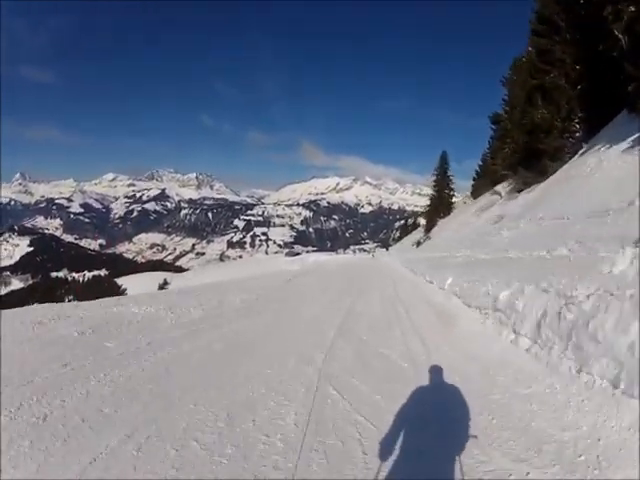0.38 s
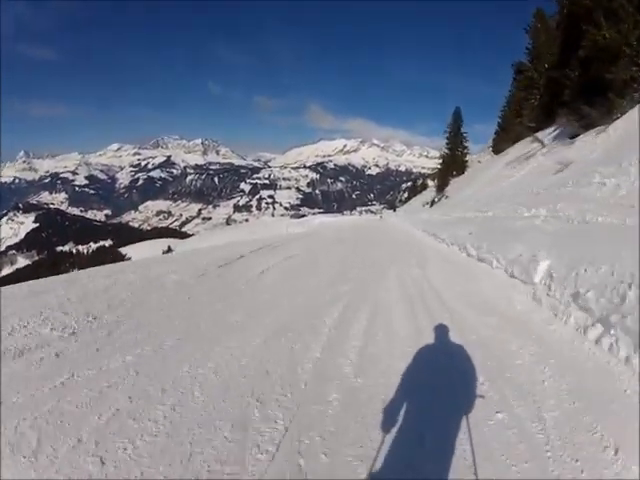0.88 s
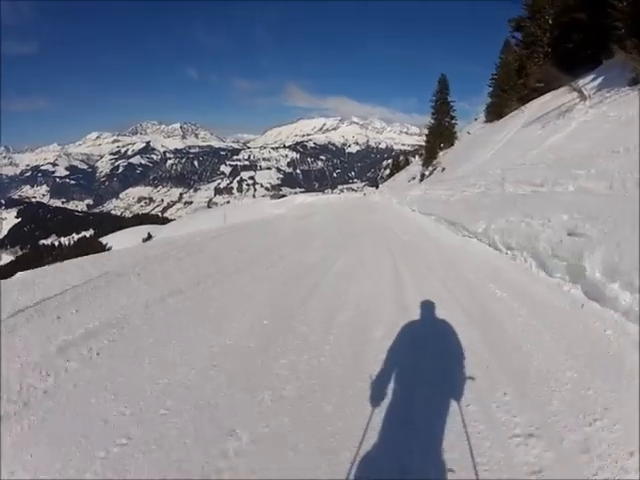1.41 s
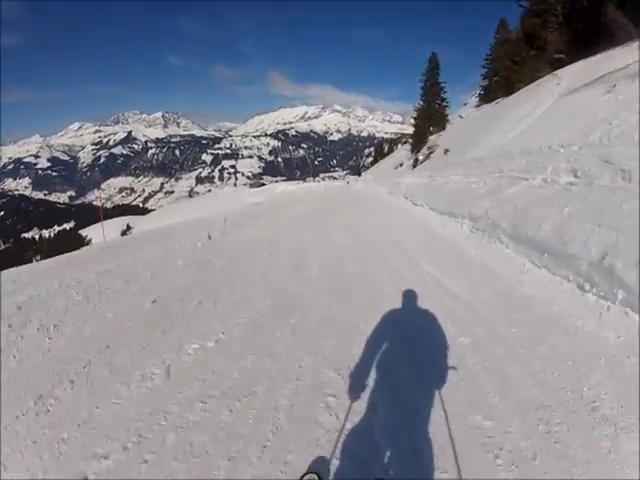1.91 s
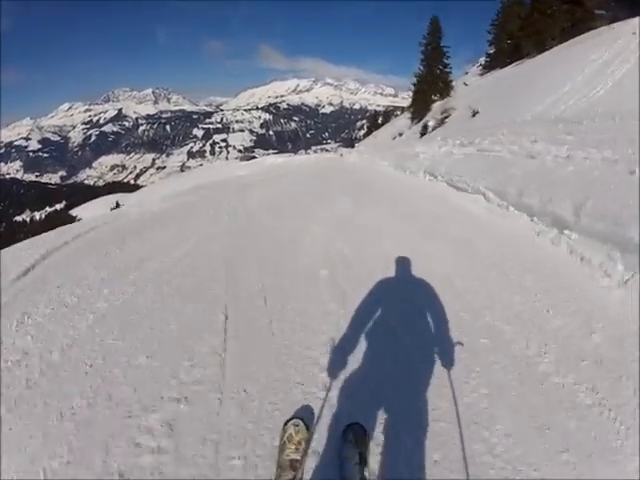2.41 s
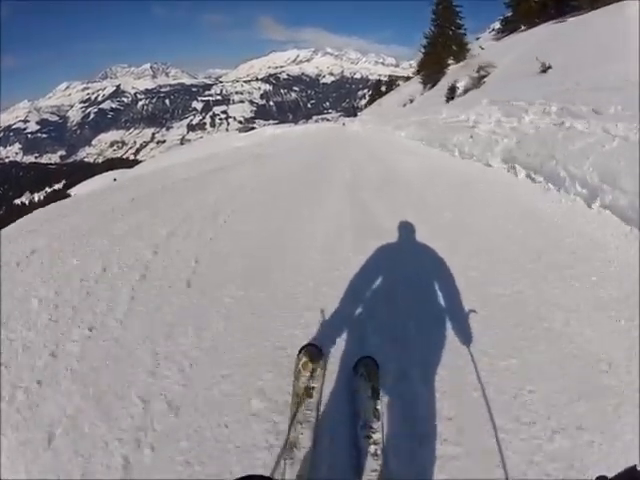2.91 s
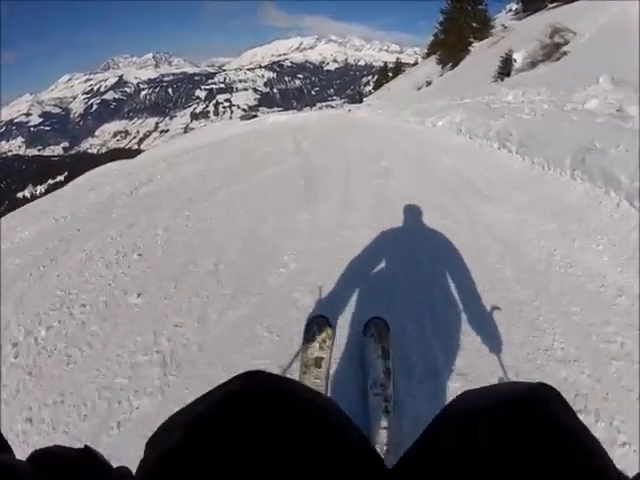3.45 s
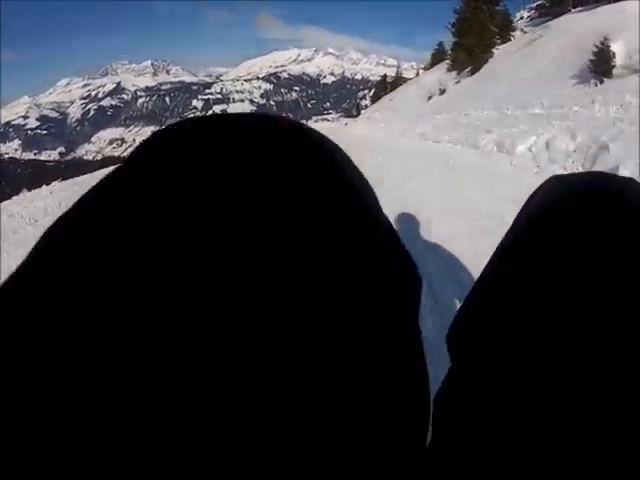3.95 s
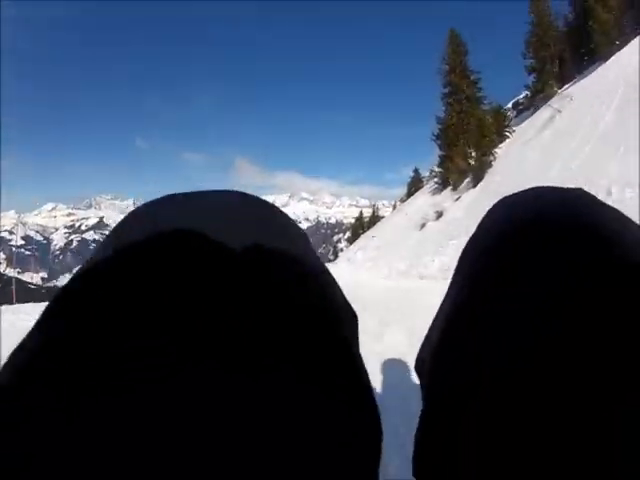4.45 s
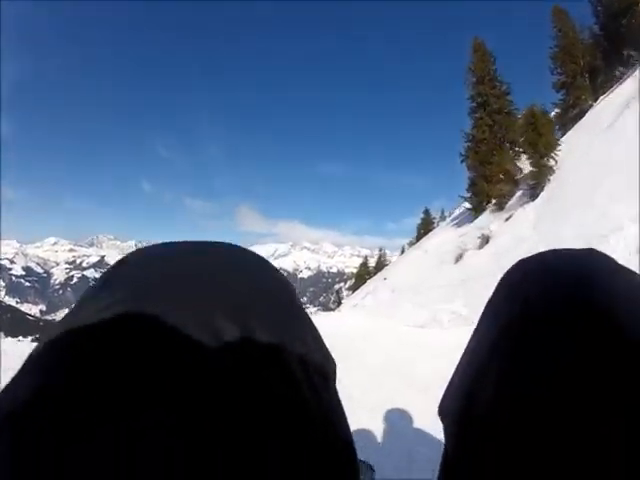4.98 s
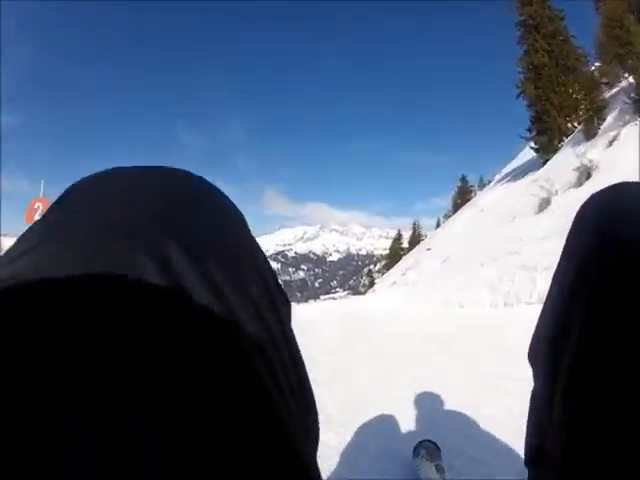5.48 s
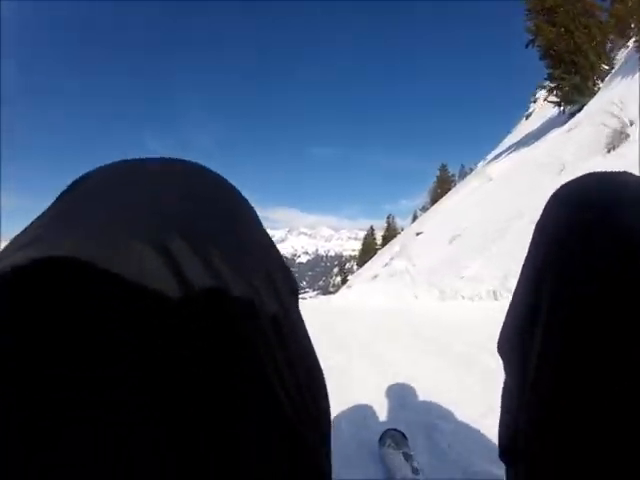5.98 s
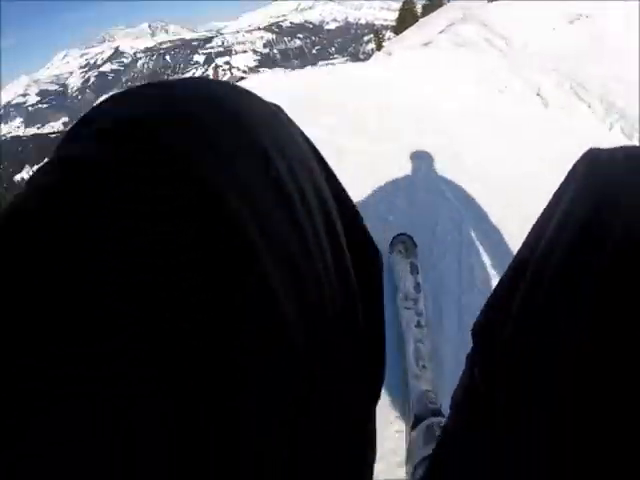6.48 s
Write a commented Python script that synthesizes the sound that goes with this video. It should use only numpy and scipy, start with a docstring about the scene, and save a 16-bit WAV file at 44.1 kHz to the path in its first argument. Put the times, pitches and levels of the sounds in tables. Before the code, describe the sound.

Skis hiss and scrape over packed snow, quiet at first, then louder and faster as wind buffets the microphone with low rumbling thumps.

```python
"""A piste of packed snow: a skier glides down, then crouches and gathers speed.
Noise and crushed grains ring the housing as ski hiss, with finer spray and a hollow drone.
Ice crumbs and buckles tick as decaying noise bursts; bumps thud through the body as short ringing pushes.
Wind shakes the sealed camera housing as lumpy low noise and single eddies; an edge grates over ice once.
The recorder samples at 12 kHz and holds each sample, which mirrors the sound up into the treble."""
import sys
import numpy as np
from scipy import signal
from scipy.io import wavfile

SR = 44100
rng = np.random.default_rng(int(sys.argv[2]) if len(sys.argv) > 2 else 0)


def field_ratio(decibels):
    """Amplitude ratio for a level in dB (20 dB per decade); scalars and array-likes work."""
    return 10 ** (np.asarray(decibels, dtype=float) / 20)


def unload_wav(signal):
    """Save mono or channel-first audio to the path in sys.argv[1] as 16-bit WAV at rate SR, clipped to [-1, 1]."""
    wavfile.write(
        sys.argv[1],
        SR,
        np.round(np.clip(np.atleast_2d(signal).T, -1, 1) * 32767).astype(np.int16),
    )


N = 291942  # samples, 6.62 s

# resonances of the housing: pitch_hz, width_hz, relative_level_db
HOUSING_MODES = [(1966, 180, 6), (2250, 240, 2.5), (2614, 64, -3), (3010, 240, -9), (3496, 278, 1),
                 (3810, 170, -3)]
# lower resonances of the housing, fed by the skier's weight: pitch_hz, width_hz, relative_level_db
LOW_HOUSING_MODES = [(1220, 340, -3), (1480, 164, -4.5), (1790, 330, -3.5)]


def rms_one(x):
    """Scale to unit power."""
    return x / np.sqrt(np.mean(x ** 2) + 1e-20)


def in_time(rows):
    """Columns of a table as curves, one value a sample."""
    s, *columns = np.transpose(rows)
    return [np.interp(np.arange(N) / SR, s, column) for column in columns]


def drift(rate_hz):
    """Slow chance: noise at every 20th sample through a double one-pole low-pass; spread 1."""
    pole = np.exp(-40 * np.pi * rate_hz / SR)
    draws = rng.standard_normal(N // 20 + 3002)
    slow = signal.lfilter([1], [1, -2 * pole, pole * pole], draws)[3000:]  # settled part only
    return np.interp(np.arange(N) / 20, np.arange(len(slow)), rms_one(slow))


def resonate(x, hz, width_hz):
    """Two-pole resonance, gain 1 on top."""
    r = np.exp(-np.pi * abs(width_hz) / SR)
    gain = (1 - r * r) / 2
    return signal.lfilter(gain * np.array([1, 0, -1]), [1, -2 * r * np.cos(2 * np.pi * hz / SR), r * r], x)


def between(x, low_hz, high_hz):
    """Gentle band-pass edges darken the valleys; rms 1."""
    band = signal.butter(2, [low_hz, high_hz], "band", fs=SR, output="sos")
    return rms_one(signal.sosfilt(band, x))


def through(modes, drive, patchy_db, patch_rate_hz, passes=1):
    """Parallel resonances with alternating signs, each swelling a little on its own; rms 1."""
    out = 0
    for k, (hz, width_hz, db) in enumerate(modes):
        ring = drive[k % 2]
        for _ in range(passes):
            ring = resonate(ring, hz, width_hz)
        out = out + (-1) ** k * field_ratio(db + patchy_db * drift(patch_rate_hz)) * ring
    return rms_one(out)


def crust(per_s, spread_db):
    """Snow grains crush at random moments, a few much harder than most; rms 1."""
    hardness_db = spread_db * np.minimum(rng.exponential(1, N), 4.5)
    sizes = field_ratio(hardness_db) * rng.choice([-1, 1], N)
    chance = per_s * field_ratio(4.0 * drift(15.0)) / SR
    return rms_one(sizes * (rng.random(N) < chance))


def patches():
    """Level change in dB as the crust roughens or lets go: a quick rise, a slower fall."""
    # rougher crust (swell) or skis lifting off it (dip): centre_s, change_db, length_s
    crust_patches = [(0.043, 4.5, 0.022), (0.208, 5.5, 0.077), (0.57, 2.5, 0.022), (0.669, 7, 0.022),
                     (1.173, 3.5, .03), (1.252, 5, 0.042), (1.62, 3, 0.07), (1.777, 6.5, 0.056),
                     (1.94, 3, 0.023), (2.267, 5.5, 0.017), (2.402, 6.5, 0.071), (2.471, -7, 0.024),
                     (2.523, 4.5, .04), (2.625, 7, 0.047), (2.84, -4, 0.043), (3.07, 3.5, .07),
                     (3.458, 7, 0.027), (3.98, -5, 0.025), (4.027, 4, 0.045), (4.114, 6.5, 0.032),
                     (4.21, -2, 0.021), (4.488, 3, 0.025), (4.29, 4, 0.048), (4.62, 2, 0.023),
                     (4.772, 4, 0.04), (4.896, 0.5, 0.03), (4.98, -8, 0.038), (5.566, 6.5, 0.057),
                     (5.703, 0, 0.069), (5.904, 2, 0.14), (6.11, -1.5, 0.032), (6.143, -0.5, 0.021),
                     (6.297, 2.5, .04), (6.417, 5.5, 0.053), (6.49, 2, 0.037)]
    t = np.arange(N) / SR
    change_db = np.zeros(N)
    for centre_s, db, length_s in crust_patches:
        side_s = length_s * np.where(t < centre_s, 0.88, 1)  # shorter on the rising side
        change_db += db * np.exp(-((t - centre_s) / side_s) ** 2)
    return change_db


def wind():
    """Lumpy low turbulence shakes the housing, growing with the airflow; rough crust shakes the shell too."""
    # airflow past the housing: time_s, flow_db, buffeting_depth_db
    airflow = [(0.0, -50.5, 0.5), (0.31, -50.5, 1), (1.46, -51, -1), (1.68, -49, 1.5), (2.14, -50.5, -1),
               (2.49, -47, 0.5), (3.02, -46, 0.5), (3.32, -49, 2), (3.54, -48.5, 3), (3.69, -39, 0),
               (4.17, -38, 0), (4.39, -34.5, -1), (5.22, -31.5, -1), (5.6, -31.5, -1), (5.84, -33, 1.5),
               (6.36, -31, 1.5), (6.51, -31, -4), (6.62, -36.5, 0)]
    # slow buffeting: pitch_hz, width_hz, relative_level_db
    buffet_modes = [(25.9, 9.1, 9), (44.9, 5.6, 8), (62.7, 11, -4)]
    # low rumble, each resonance passed twice: pitch_hz, width_hz (one pass), relative_level_db
    rumble_modes = [(81.2, 54, 1), (126.3, 52, 0.5), (166, 31, -9)]
    # boom of the shell, each resonance passed twice: pitch_hz, width_hz (one pass), relative_level_db
    boom_modes = [(204.7, 84, -3), (257, 65.5, 0.5), (317, 125, -10.5)]

    flow_db, depth_db = in_time(airflow)
    swing_db = flow_db + 45  # around an airflow of -45 dB
    # level at that airflow, and the share of its swing that each layer follows
    deep_db = -44.5 + 0.96 * swing_db + depth_db
    rumble_db = -48 + 0.95 * swing_db
    boom_db = -53 + 0.68 * swing_db + 0.36 * patches()

    gusts_db = 1.36 * drift(10.0)
    soft = field_ratio(0.65 * gusts_db) * rng.standard_normal((2, N))
    lumpy = field_ratio(gusts_db + 1.2 * drift(29.0)) * rng.standard_normal((2, N))
    deep = through(buffet_modes, soft, patchy_db=0.8, patch_rate_hz=2.3)
    rumble = through(rumble_modes, lumpy, patchy_db=1.5, patch_rate_hz=9.0, passes=2)
    boom = through(boom_modes, lumpy[::-1], patchy_db=4.0, patch_rate_hz=5.6, passes=2)
    return field_ratio(deep_db) * deep + field_ratio(rumble_db) * rumble + field_ratio(boom_db) * boom


def eddies():
    """Single eddies slap the housing: each presses and sucks for a cycle or two."""
    # centre_s, envelope_peak_db, pitch_hz
    slaps = [(0.199, -45, 31), (0.646, -36, 36.4), (0.797, -48, 38), (1.461, -45, 30.2),
             (1.806, -37.5, 115), (1.97, -39.5, 39.8), (2.223, -35.5, 40), (2.49, -38, 38),
             (3.014, -36.5, 29), (3.13, -34.5, 112), (3.307, -34, 35.8), (3.521, -28.5, 31),
             (3.653, -26, 23.6), (3.728, -25, 22.9), (4.333, -24.5, 102), (4.375, -19.5, 31.2),
             (4.611, -26.5, 110), (4.886, -26, 127), (4.77, -24, 50), (4.859, -24, 40.2),
             (4.916, -21.5, 37.4), (4.951, -22, 45), (5.141, -20.5, 109), (5.179, -20, 42.7),
             (5.209, -23, 104), (5.298, -24.5, 36), (5.369, -23.5, 133), (5.652, -24, 34.3),
             (6.004, -20, 30.6), (6.256, -22, 31.3), (6.318, -22, 134)]
    out, t = np.zeros(N), np.arange(N) / SR
    for (centre_s, db, hz), turn in zip(slaps, rng.random(len(slaps))):
        first = max(round((centre_s - 3 / hz) * SR), 0)
        near = slice(first, round((centre_s + 3 / hz) * SR))
        cycles = (t[near] - centre_s) * hz
        swell = np.exp(-(cycles / 0.67) ** 2)
        out[near] += field_ratio(db) * swell * np.cos(2 * np.pi * (cycles + turn))
    return out


def grate():
    """An edge grates over ice: sparse hard chips and bright grit, silent before and after."""
    start_s, rise_s, end_s, fall_s, level_db = 5.82, 0.04, 5.95, 0.086, -43.5
    t = np.arange(N) / SR
    level = np.clip((t - start_s) / rise_s, 0, 1) * np.clip(1 - (t - end_s) / fall_s, 0, 1)
    chips = crust(per_s=560.0, spread_db=2.5)
    grit = between(chips + field_ratio(-10) * rng.standard_normal(N), 3700, 7500)
    return field_ratio(level_db) * level * grit / np.std(grit[level > 0])


def thuds():
    """A bump is a soft push that rings two or three cycles, with a short hollow knock on top."""
    # bumps through the body: start_s, push_db, push_pitch_hz, knock_db, knock_pitch_hz (before the envelopes)
    bumps = [(0.178, -40, 231, -55, 463), (0.199, -39, 233, -34, 710), (1.274, -37.5, 157, -37, 1190),
             (1.768, -34, 122, -43, 754), (2.252, -34.5, 207, -45, 960), (2.269, -41, 155, -38, 450),
             (2.315, -34.5, 147, -64, 452), (2.38, -28, 175, -36, 1230), (2.394, -26, 134, -32, 690),
             (2.452, -26.5, 232, -62, 590), (2.543, -36, 148, -41, 1060), (2.599, -28, 117, -42, 980),
             (2.893, -34, 249, -43, 592), (3.551, -29, 257, -56, 496), (3.793, -27.5, 270, -38, 630),
             (4.124, -25.5, 180, -48, 1220), (4.476, -28, 124, -50, 1220), (5.844, -16, 118, -24, 680),
             (6.169, -21, 181, -38.5, 1260), (6.409, -16, 236, -25.5, 710), (6.427, -17, 120, -39, 557)]
    out, t = np.zeros(N + SR), np.arange(round(0.06 * SR)) / SR
    for start_s, push_db, hz, knock_db, knock_hz in bumps:
        push = t * hz * np.exp(1 - t * hz / 0.68) * np.sin(2 * np.pi * hz * t)
        knock = t / 0.0029 * np.exp(1 - t / 0.0014) * np.sin(2 * np.pi * knock_hz * t)
        out[round(start_s * SR):][:len(t)] += field_ratio(push_db) * push + field_ratio(knock_db) * knock
    return out[:N]


def ticks():
    """A dry snap and a few milliseconds of rattle: its own pitch, the ringing housing, and a broad bright edge."""
    # ice crumbs and buckles: start_s, peak_db, pitch_hz, sharpness_db (bright edge), decay_s
    clicks = [(0.1585, -40.5, 2100, -30, 0.006), (0.5162, -40, 2260, -4, 0.0045),
              (0.5541, -33.5, 2740, -24, 0.0047), (0.5944, -43, 2110, -10, 0.0045),
              (0.6539, -36.5, 2210, -27, 0.0051), (0.7133, -31.5, 2460, -31, 0.0038),
              (0.757, -42, 2110, -15, 0.0045), (0.897, -40, 1990, -12, 0.0045),
              (1.2027, -25.5, 2100, -32, 0.004), (1.2311, -33.5, 2090, -29, 0.0041),
              (1.2435, -37, 2090, -21, 0.0045), (1.4017, -36.5, 2250, -32, 0.0038),
              (1.4234, -41, 2200, -13, 0.0051), (1.5928, -49, 2230, -26, 0.0045),
              (1.7888, -38, 2240, -26, 0.0041), (1.8387, -37, 2260, -6, 0.005),
              (1.9869, -32, 2280, -27, 0.0041), (2.1375, -37.5, 3300, -28, 0.0041),
              (2.4967, -41, 2220, -24, 0.0045), (2.597, -35, 2020, -16, 0.0051),
              (2.6524, -31.5, 2240, -29.5, 0.0035), (2.7661, -36, 2000, -8, 0.0045),
              (2.9447, -30, 2310, -6, 0.0056), (3.0754, -35, 2190, -18, 0.0051),
              (3.2181, -40, 2290, -26, 0.0045), (3.2999, -38, 2240, -27, 0.0041),
              (3.3533, -33.5, 2150, 3, 0.0045), (3.5194, -31.5, 2070, 4, 0.0063),
              (3.6874, -39, 2300, -9, 0.0045), (3.9175, -36, 1950, -22, 0.0038),
              (4.0053, -31, 3810, -12, 0.0045), (4.0502, -28.5, 2100, -25, 0.0045),
              (4.1155, -34, 2340, -29, 0.0045), (4.1944, -27.5, 3480, -23, 0.0052),
              (4.2652, -33.5, 2100, -24, 0.0049), (4.4692, -27.5, 2110, -6, 0.0038),
              (5.2859, -27, 2300, -13, 0.004), (5.5428, -25, 1730, -29, 0.0052),
              (5.814, -31, 2270, -11, 0.0045), (5.8351, -24, 1600, -4, 0.0051),
              (5.8484, -26.5, 1760, -24, 0.0053), (5.872, -28, 1900, -20, 0.0045),
              (5.8774, -22, 2190, -20.5, 0.0058), (5.9014, -30, 2340, -14, 0.0045),
              (5.917, -26, 2050, -15, 0.0045), (5.925, -26, 2200, -9, 0.0049),
              (5.9678, -21, 2290, -17, 0.0045), (5.9814, -25, 2290, -8, 0.005),
              (6.0521, -18.5, 1900, -7, 0.0045), (6.131, -20.5, 2150, -27, 0.0038),
              (6.1414, -32, 1960, -37, 0.004), (6.4712, -31, 2280, -15, 0.0045)]
    out, t = np.zeros(N + SR), np.arange(round(0.054 * SR)) / SR
    noise = rng.standard_normal((len(clicks), 2, len(t)))
    noise[:, :, 0] += 5  # the snap
    for (start_s, peak_db, hz, sharp_db, decay_s), rattle in zip(clicks, noise):
        burst, shake = rattle * np.exp(-t / decay_s)
        own = between(burst, 0.85 * hz, 1.17 * hz)
        shell = 0
        for k, (mode_hz, width_hz, db) in enumerate(LOW_HOUSING_MODES + HOUSING_MODES):
            shell = shell + (-1) ** k * field_ratio(db) * resonate(shake, mode_hz, width_hz)
        edge = between(burst * np.exp(-t / 0.0043), 2160, 5160)  # the bright edge dies first
        body = own + field_ratio(-2.5) * rms_one(shell)
        tick = body / np.abs(body).max() + field_ratio(sharp_db) * edge
        out[round(start_s * SR):][:len(t)] += field_ratio(peak_db) * tick / np.abs(tick).max()
    return out[:N]


def skis():
    """Sliding hiss plus crushed grains, chattering with the ripples of the piste; the spray is finer and steadier."""
    # skis on snow: time_s, crust_hiss_db (before patches), weight_db (low part over hiss), looseness_db (spray)
    glide = [(0.0, -59, -4, 3.5), (0.4, -60, -5.5, 3), (0.8, -60, -1, 2.5), (1.1, -54, -7.5, 2),
             (1.5, -58.5, -4, 2.5), (2.2, -57, -5, 2), (2.5, -53.5, -6.5, 2.5), (2.85, -55, -4, 2.5),
             (3.1, -54, -5, 2), (3.5, -54.5, -5.5, 5), (3.75, -46, -5.5, 2.5), (4.15, -47.5, -5.5, -2.5),
             (4.7, -48.5, 2.5, -0.5), (4.82, -53, 1, 0), (5.17, -49.5, 2, -4), (5.23, -44.5, -2, 0),
             (5.5, -45, -0.5, 2), (6.2, -43, 0.5, -0.5), (6.62, -39, -7.5, 3)]
    # spray: pitch_hz, width_hz, relative_level_db
    spray_modes = [(4120, 200, 5), (4880, 480, 0), (5560, 420, 6)]
    # drone, each resonance passed twice: pitch_hz, width_hz (one pass), relative_level_db
    drone_modes = [(500, 420, 0.5), (640, 280, 11)]

    t = np.arange(N) / SR
    hiss_db, weight_db, loose_db = in_time(glide)
    patch_db = patches()
    swing_db = hiss_db + 52  # around a hiss of -52 dB
    crouch = 0.5 + 0.5 * np.tanh((t - 3.83) / 0.21)  # 0 upright, 1 crouched
    # level at that hiss, then the shares of its swing and of the patches
    spray_db = -61.5 + 0.73 * swing_db + 0.31 * patch_db + loose_db + 0.62 * drift(3.5)
    drone_db = -67.5 + 0.79 * swing_db + 0.6 * patch_db + 6.5 * crouch

    chatter_db = 0.75 * drift(57.0) + 2.0 * drift(68.0) + 0.53 * drift(16.0)
    fine_db = 0.69 * chatter_db + 1.45 * drift(44.0)
    grains = crust(per_s=900.0, spread_db=4.0)
    drive = field_ratio(chatter_db) * (rng.standard_normal((2, N)) + field_ratio(0.24) * grains)
    fine = field_ratio(fine_db) * (rng.standard_normal((2, N)) + field_ratio(-17) * grains)

    hiss = between(through(HOUSING_MODES, drive, patchy_db=1.0, patch_rate_hz=10.6), 1836, 3500)
    low = between(through(LOW_HOUSING_MODES, drive[::-1], patchy_db=1.0, patch_rate_hz=18.0), 946, 2070)
    spray = through(spray_modes, fine, patchy_db=-1.8, patch_rate_hz=13.0)
    drone = through(drone_modes, drive, patchy_db=4.5, patch_rate_hz=5.5, passes=2)
    sliding = field_ratio(hiss_db + patch_db) * (hiss + field_ratio(weight_db) * low)
    return sliding + field_ratio(spray_db) * spray + field_ratio(drone_db) * drone


def scene():
    """All sources reach one microphone."""
    return (wind() + eddies() + grate() + thuds() + ticks() + skis())[None]


def top_cut(x):
    """Nothing passes above the cut-off."""
    return signal.sosfilt(signal.butter(12, 15350, fs=SR, output="sos"), x)


def record(dry):
    """Low-pass, sample at 12 kHz, hold each sample four times at 48 kHz, convert back, trim the top."""
    smooth = signal.sosfilt(signal.butter(14, 5650, fs=SR, output="sos"), dry)
    coarse = signal.resample_poly(smooth, 40, 147, axis=1)  # 44.1 to 12 kHz
    stairs = np.repeat(coarse, 4, axis=1)
    held = signal.resample_poly(stairs, 147, 160, axis=1)[:, :N]  # 48 to 44.1 kHz
    trimmed = signal.sosfilt(signal.cheby1(10, 0.5, 15250, fs=SR, output="sos"), held)
    return top_cut(trimmed)


dry = scene()
out = record(dry)
unload_wav(out)
```